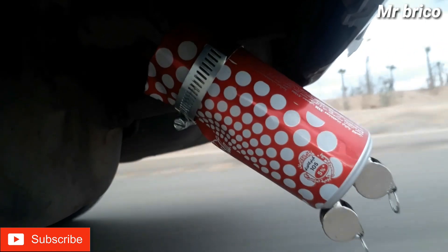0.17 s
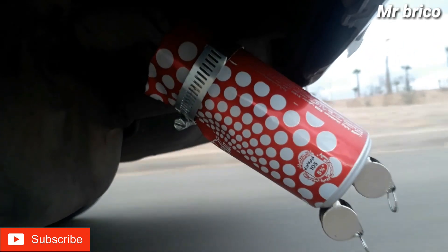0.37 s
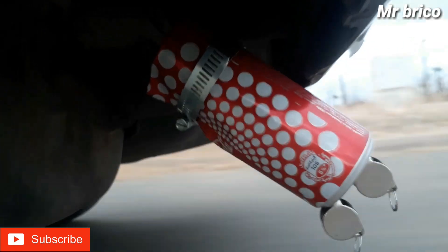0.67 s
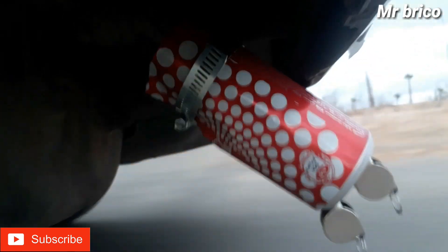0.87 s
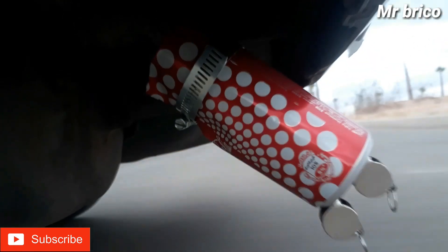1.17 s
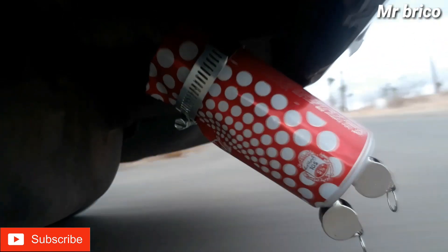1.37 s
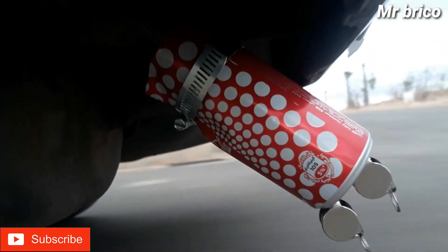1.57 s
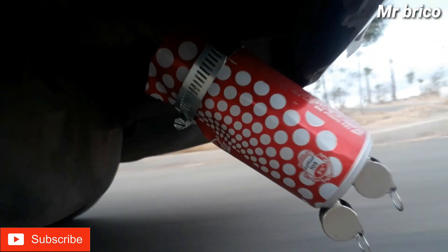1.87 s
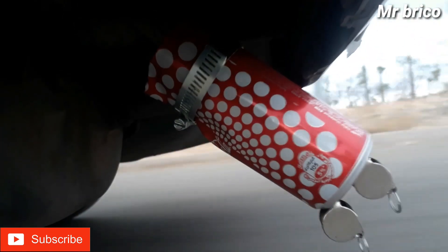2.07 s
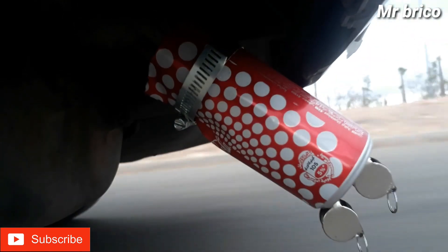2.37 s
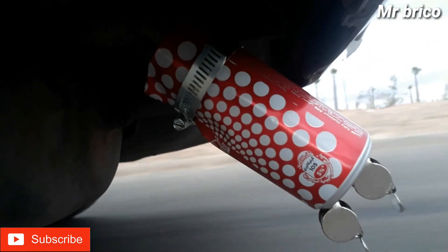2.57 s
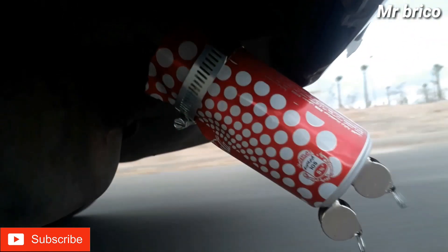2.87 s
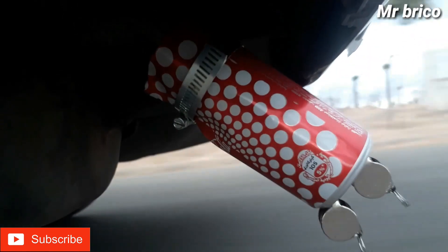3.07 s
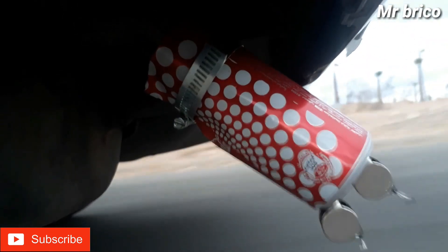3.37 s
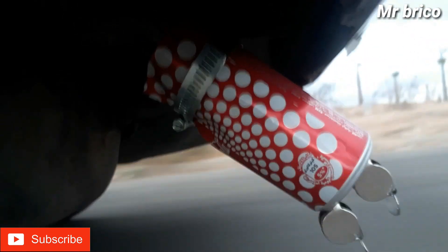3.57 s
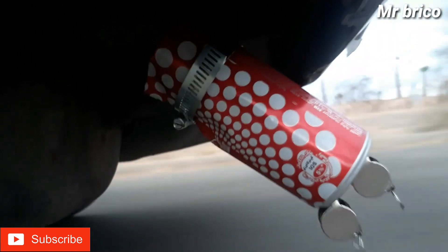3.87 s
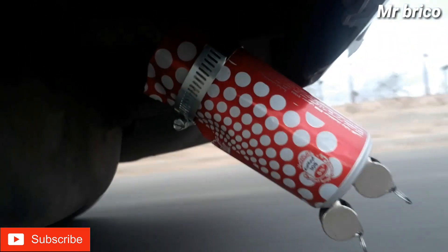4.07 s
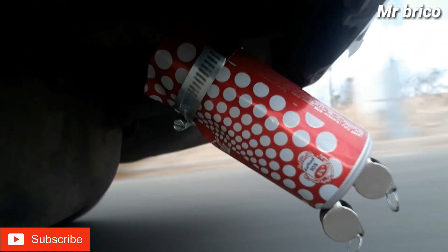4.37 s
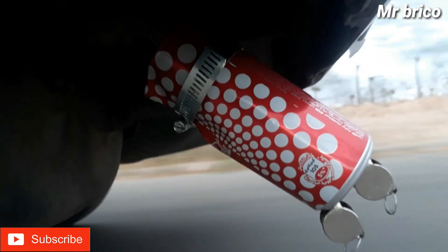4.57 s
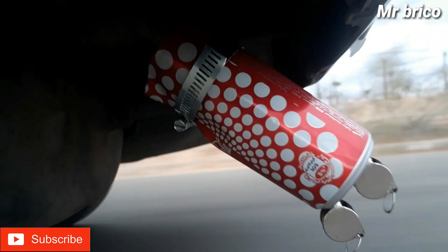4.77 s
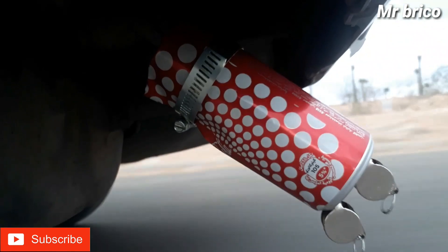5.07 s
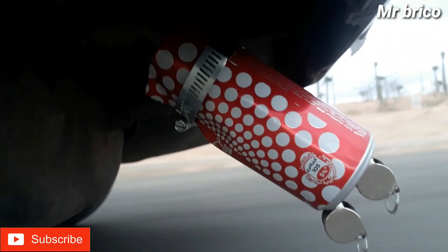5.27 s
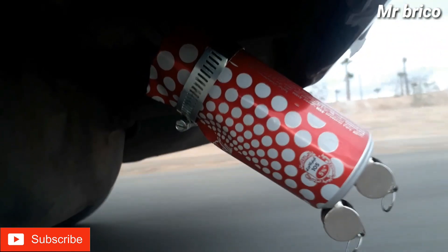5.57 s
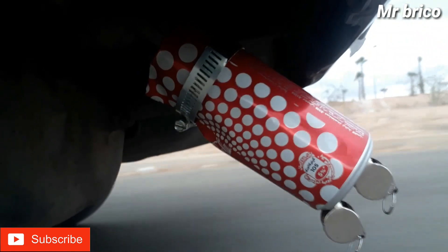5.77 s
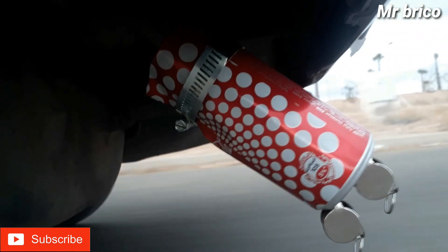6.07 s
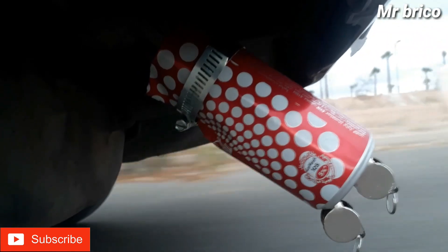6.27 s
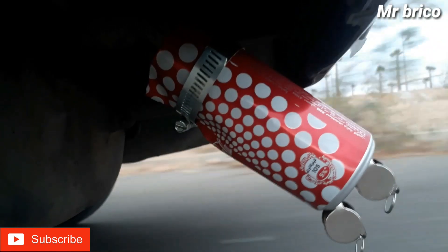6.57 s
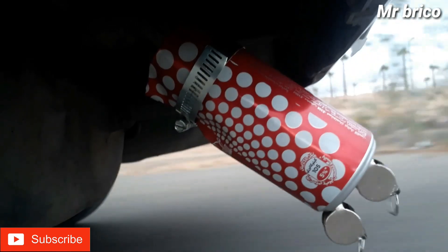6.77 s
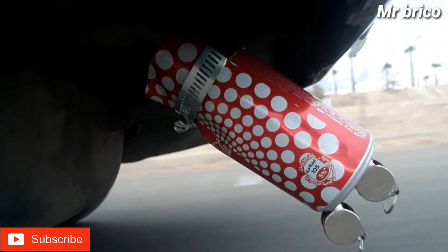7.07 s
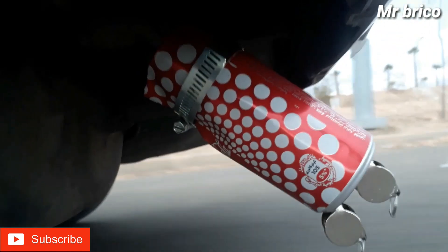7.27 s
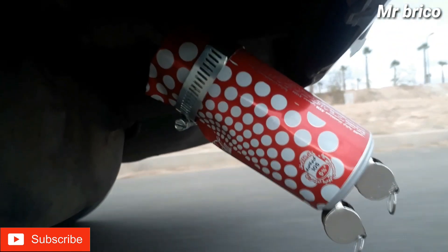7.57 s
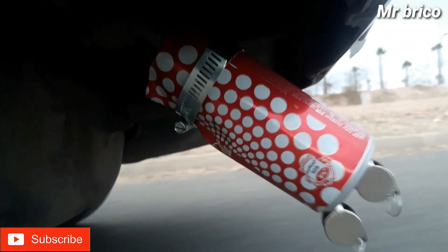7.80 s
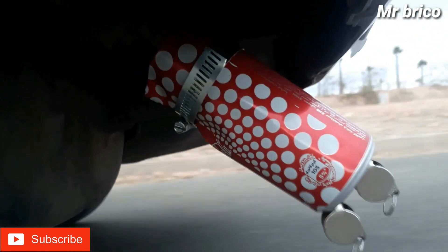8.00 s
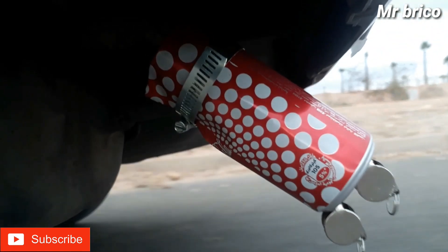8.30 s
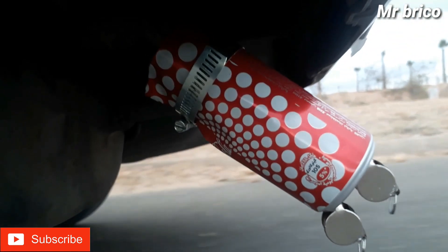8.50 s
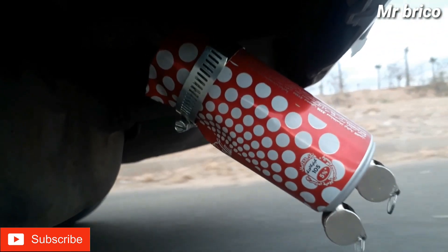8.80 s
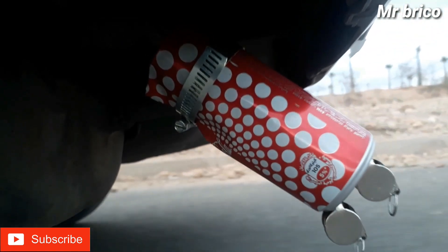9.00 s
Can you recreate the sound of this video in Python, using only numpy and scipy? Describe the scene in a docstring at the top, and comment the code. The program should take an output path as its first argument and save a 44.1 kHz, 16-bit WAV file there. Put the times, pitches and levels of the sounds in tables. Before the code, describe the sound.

Two metal whistles blown by car exhaust warble rapidly, fuse into a piercing rising shriek, then break into slowing chirps over road rumble.

```python
"""Two pea-less whistles in a drink can, clamped over a moving four-cylinder car's tailpipe, are heard from close by.
Exhaust puffs blow them: they warble, merge into a rising shriek as the engine speeds up, then break into idle chirps.
The whistles are swept sine tones with overtones, and filtered noise hisses at their mouths.
Underneath: noise for tyres, air, wind and a rubbing brake, sines for hum, whine and thin squeals,
low thumps from the idling exhaust, and short noise bursts for ticks, knocks and gusts."""
import sys
import numpy as np
from scipy import signal
from scipy.fft import rfft, irfft, next_fast_len
from scipy.io import wavfile

SR = 44100
rng = np.random.default_rng(int(sys.argv[2]) if len(sys.argv) > 2 else 0)


def materialize(psi):
    """Save the field psi as 16-bit PCM at rate SR to the path in sys.argv[1].

    A 1-D psi becomes a single channel; in a 2-D psi each row is a channel.
    """
    bounded = np.clip(np.atleast_2d(psi).T, -1, 1)
    quanta = np.round(bounded * 32767).astype(np.int16)
    wavfile.write(sys.argv[1], SR, quanta)


N = 403062
TIME = np.arange(N) / SR

# Engine speed: time_s, firings_per_s
FIRING = [(0.0, 71.421), (1.762, 78.096), (2.525, 84.857), (3.158, 95.945), (3.981, 105.992),
          (4.523, 79.367), (5.269, 48.342), (5.614, 38.202), (5.803, 31.455), (6.544, 28.406),
          (6.864, 26.452), (7.504, 26.556), (9.14, 26.569)]
# Cylinders in firing order: puff_weakness (scaled by the unevenness), puff_length (ratio)
CYLINDERS = [(.03, 1.05), (.34, 1.02), (.45, .97), (0.0094, .85)]
# Pulsing of the flow: time_s, dip_between_puffs_db (at zero flow), pitch_swing_hz (per unit of flow),
# puff_half_width_firings (before each cylinder's ratio), cylinder_unevenness (factor), cycle_swell (flow)
PULSING = [(0, 38.5, 263, 0.39, 0.71, 0.1), (2.15, 34, 298.5, 0.45, 0.67, 0.14),
           (2.58, 6.5, 164, 0.39, 0.45, 0.056), (3.05, 1.5, 104, 0.48, 0.34, 0.085),
           (4.38, 2, 85, 0.52, 0.34, 0.072), (4.66, 22.5, 380, 0.29, .27, 0.0029),
           (5.86, 51.5, 643.5, 0.2, .13, 0.0098), (5.9, 54, 821.6, .22, 1.45, 0.023),
           (8, 50.5, 620, .195, 1.35, 0.00654), (9.14, 43, 501, 0.19, 0.74, 0.0052)]
# Tyres, air and jets, before each layer's trim: time_s, rumble_db, rush_db, hiss_db
AIR = [(0, -25.5, -29.5, -35.5), (1.5, -24.5, -27.5, -32), (2.4, -30, -36, -40), (3, -27, -32, -37),
       (3.8, -26, -25, -32.5), (4.3, -28.5, -34.5, -36), (5, -31, -31, -40), (5.7, -23, -26.5, -36),
       (6.5, -26, -29, -36.5), (7.3, -35, -36, -39.5), (9.14, -44, -39, -43.5)]
# Wind on the microphone: time_s, level_db
WIND_LEVEL = [(0, -64), (2.1, -50), (2.6, -32), (3.3, -30), (4.3, -35.5), (4.45, -59), (5.25, -45),
              (5.6, -36.5), (9.14, -41.5)]
# Thump of the strong puffs at idle, before puff strength: time_s, level_db
THUMP = [(5.25, -55), (5.55, -18), (5.8, -14), (6.9, -15), (7.7, -25), (9.14, -32.5)]
# Exhaust hum, before the pipe colours it: time_s, level_db
HUM = [(0, -36), (3, -36.5), (3.9, -47), (4.5, -37), (5.5, -38), (6.2, -48), (9.14, -56)]
# The pipe's response to the hum: frequency_hz, gain_db
PIPE = [(25, -31), (45, -1), (88, -2), (115, -4), (150, -1.5), (180, -0.5), (225, 1), (245, -16),
        (320, -22)]
# Drivetrain whine, sinking as the engine slows: time_s, pitch_hz, level_db
WHINE = [(0, 1100, -80), (4.9, 1100, -60), (5.2, 1000, -44), (5.45, 880, -41), (5.7, 780, -38),
         (5.9, 740, -55), (9.14, 740, -80)]
# Rubbing brake: time_s, level_db
RUB = [(0, -75), (4.8, -60), (5.25, -45), (7, -42), (8, -42), (9.14, -44)]
# Brake disc resonances: centre_hz, width_hz, relative_level_db
DISC = [(6580, 130, -1), (8580, 75, -7), (10300, 80, 0), (11300, 50, -9), (12400, 90, -6), (13060, 100, -5)]
# Brake squeals: peak_s, level_db, swell_s, fade_s
SQUEALS = [(4.5, -25.5, 0.025, 0.03), (6.76, -21.5, 0.018, .17), (7.151, -26, 0.021, 0.061),
           (7.58, -26.5, .2, 0.093), (8.02, -38.5, 0.051, 0.059), (8.2, -37.5, 0.021, 0.13),
           (8.62, -28.5, 0.076, 0.032), (9.01, -29.5, 0.017, .12)]
# Ticks on metal, from grit and the whistles' rings: start_s, level_db
TICKS = [(.28, -23), (5.49, -16), (6.465, -30), (6.808, -15.5), (6.927, -9)]
# Dull knocks under the car: start_s, level_db
KNOCKS = [(.37, -20), (.626, -15), (.68, -14)]
# Rough gusts at full speed: start_s, level_db
GUSTS = [(3.112, -21), (3.202, -18), (3.246, -19.5), (3.295, -19), (3.452, -20), (3.768, -20), (3.868, -21),
         (3.935, -23.5)]

# Noise colours, scaled to unit power in use: frequency_hz, relative_density_db
RUMBLE = [(25, -34), (55, -28), (100, -4.5), (150, -0.5), (250, 1.5), (330, 0.5), (420, -3), (530, -5),
          (585, -0.5), (640, -13.5), (1000, -12.5), (2000, -42)]  # tyre rumble
RUSH = [(300, -35), (650, 3), (800, 4.5), (1020, 4.5), (1300, 1.5), (1700, -1.5), (2600, 0.5),
        (5000, -16.5)]  # tyre and air rush, also the gusts
HISS = [(800, -3.5), (1800, 4.5), (3500, 16), (5000, 10), (6700, 10), (7600, 10.5), (10500, 10), (11600, 8),
        (12300, 13.5), (13200, 9), (16000, 2.5)]  # whistle jets
WIND = [(20, -32), (40, -12), (65, 9), (110, 9.5), (180, 5), (400, -53)]  # wind on the microphone
TICK_COLOUR = [(2000, 0), (5000, -8), (8500, 1), (12000, -3), (16000, -9)]  # metal ticks
KNOCK_COLOUR = [(400, -10), (850, -10), (1050, -2), (1300, -10), (1700, -15), (2500, -28)]  # underbody knocks

# Main whistle's blowing: time_s, mean_pitch_hz, level_db, overtone_db (from the fundamental, before a trim)
WHISTLE = [(0, 2360, -16, -8), (0.8, 2395, -13, -7.5), (1.7, 2479, -12.5, -10.5), (2.3, 2668, -8, -15.5),
           (2.8, 2777, -4.5, -9.5), (3.66, 3075, -11, 0), (3.87, 3052, -10, -2), (4, 2930, -6.5, -4.5),
           (4.36, 2683, -8.5, -10.5), (4.52, 2610, -13.5, -9.5), (4.93, 2323, -25.5, -1.5),
           (5.27, 2079, -28, -2), (5.52, 2100, -19.5, -1.5), (5.73, 2400, -13.5, -6.5),
           (5.9, 2330, -18.5, -2.5), (6.63, 2307, -19.5, -4), (6.88, 2081, -24.5, -0.5),
           (7.5, 2112, -26.5, -1.5), (7.74, 1935, -28.5, 0.5), (9.14, 1885, -34, 3)]
# Whistle overtones: pitch_multiple, level_db (against the overtone level)
OVERTONES = [(2, 0), (3, -3.5), (4, -7), (5, -11)]
# Spells when the whistle may choke: start_s, end_s, chance_per_weak_puff, depth_db (before cycle levelling)
CHOKING = [(2.5, 3.1, .3, 10.5), (3.6, 3.7, .25, 49), (4.07, 4.42, .35, 19.5)]
# Second whistle, speaking on the gentle flanks of the puffs: time_s, level_db
FLANKS = [(0, -70), (4.78, -42), (4.98, -27.5), (5.4, -31), (7, -28), (9.14, -28.5)]
# Chirps of the two weak cylinders: crest_firings (after cycle start), relative_level_db, lead_in_s, run_out_s
CHIRPING = [(1.249, -1.5, 0.013, 0.005), (2.111, 0.5, 0.0074, 0.0039)]
# Chirp level, before a trim and each chirp's own offset: time_s, level_db
CHIRP_LEVEL = [(4.8, -48), (5.05, -14), (5.35, -45), (5.85, -43), (5.92, -8), (6.2, -7), (6.7, -2.5),
               (7.5, -3.5), (8.45, -10.5), (9.14, -21)]

ARCH_HZ_PER_SWELL = 400  # the pitch also arches with each engine cycle's swell
UNDERBODY_DB, UNDERBODY_DELAY_S, UNDERBODY_DECAY_S = -16.5, 0.0017, 0.0043
CUTOFF_HZ = 15800


def from_db(db):
    """Decibels to gain."""
    return 10 ** (np.asarray(db) / 20)


def rms_one(x):
    """Scale to unit power."""
    return x / np.sqrt(np.mean(np.abs(x) ** 2) + 1e-20)


def in_time(rows):
    """Draw one automation curve per column, at every sample."""
    times, *columns = np.transpose(rows)
    return [np.interp(TIME, times, column) for column in columns]


def shaped(gain_at):
    """Unit noise whose amplitude spectrum is a function of frequency."""
    size = next_fast_len(N)
    hz = np.maximum(np.fft.rfftfreq(size, 1 / SR), 1)
    spectrum = rfft(rng.standard_normal(size)) * gain_at(hz)
    return rms_one(irfft(spectrum, size)[:N])


def noise(colour):
    """Unit noise coloured by points on a log frequency axis."""
    points_hz, db = np.transpose(colour)
    return shaped(lambda hz: from_db(np.interp(np.log(hz), np.log(points_hz), db, left=-80, right=-80)))


def drift(rate_hz):
    """Random wander of spread 1, up to about this rate."""
    return shaped(lambda hz: 1 / (1 + (hz / rate_hz) ** 2))


def resonance(centre_hz, width_hz):
    """Unit noise ringing in one narrow resonance."""
    return shaped(lambda hz: 1 / (1 + ((hz - centre_hz) / width_hz) ** 2))


def angle(hz):
    """Running phase of a pitch curve."""
    return 2 * np.pi * np.cumsum(hz) / SR


def lagging(x, lag_s):
    """Follow a control with a short smoothing lag."""
    keep = np.exp(-1 / (lag_s * SR))
    return signal.lfilter([1 - keep], [1, -keep], x)


def cycle_mean(x, firings):
    """Mean of x over the four firings around each moment."""
    total = np.cumsum(x)
    first, last = (np.clip(np.searchsorted(firings, firings + k), 0, N - 1) for k in (-2, 2))
    return (total[last] - total[first]) / (last - first)


def throb(gain, firings):
    """Keep the pulsing of a gain but level each engine cycle to unit power."""
    return gain / np.sqrt(cycle_mean(gain ** 2, firings) + 1e-12)


def cycle_times(firings, place):
    """The moments when each engine cycle reaches a place, counted in firings."""
    return np.interp(np.arange(place, firings[-1], len(CYLINDERS)), firings, TIME)


def road(rumble_gain_db=-2.5, rush_gain_db=-3.0, gust_db=2.0):
    """Tyres on asphalt and air under the car: two wavering bands of noise."""
    rumble_db, rush_db, _ = in_time(AIR)
    rumble = from_db(rumble_db + rumble_gain_db + gust_db * drift(58)) * noise(RUMBLE)
    rush = from_db(rush_db + rush_gain_db + gust_db * drift(49)) * noise(RUSH)
    return rumble + rush


def buffeting(firings, rate, strength, delay_s=0.01143, thump_hz=88, length_s=0.0077):
    """Wind on the microphone; each strong slow puff reaches it a moment later as a low thump."""
    (wind_db,), (thump_db,) = in_time(WIND_LEVEL), in_time(THUMP)
    wind = from_db(wind_db + 1.06 * drift(36)) * noise(WIND)
    t = firings % 1 / rate - delay_s
    body = np.cos(2 * np.pi * thump_hz * t) + 0.44 * drift(260)
    thump = np.exp(-(t / length_s) ** 2) * body
    return wind + from_db(thump_db) * strength ** 2 * thump


def hits(rows, colour, decay_s):
    """Short bursts of coloured noise with an instant attack and a fast exponential decay."""
    blows = np.zeros(N)
    for start_s, level_db in rows:
        blows[int(start_s * SR)] = from_db(level_db)
    envelope = signal.lfilter([1], [1, -np.exp(-1 / (decay_s * SR))], blows + 1e-18)
    return envelope * noise(colour)


def brake(squeal_hz=9000, waver_hz=38):
    """The pad rubs the disc's modes as noise; a separate locked tone swells and fades as squeals."""
    rub_db, = in_time(RUB)
    rub = rms_one(sum(from_db(db + 2.5 * drift(8)) * resonance(hz, width) for hz, width, db in DISC))
    locked = np.zeros(N)
    for peak_s, level_db, swell_s, fade_s in SQUEALS:
        distance = np.maximum((peak_s - TIME) / swell_s, (TIME - peak_s) / fade_s)
        locked += from_db(level_db) * np.exp(-np.minimum(distance, 20))
    tone = np.sin(angle(squeal_hz + waver_hz * drift(79.0)))
    squeal = locked * from_db(2 * drift(68)) * tone
    return from_db(rub_db) * rub + np.sqrt(2) * squeal


def whine(waver_hz=22):
    """An unsteady sine from the drivetrain."""
    hz, db = in_time(WHINE)
    level = np.sqrt(2) * from_db(db + 4.9 * drift(27.4))
    return level * np.sin(angle(hz + waver_hz * drift(53)))


def exhaust_hum(firings, rate, waver_db=1.5):
    """The three lowest multiples of the firing rate, coloured by the pipe."""
    hum_db, = in_time(HUM)
    pipe_hz, pipe_db = np.transpose(PIPE)
    hum = np.zeros(N)
    for k in (1, 2, 3):
        response_db = np.interp(np.log(k * rate), np.log(pipe_hz), pipe_db)
        level = from_db(hum_db + response_db + waver_db * drift(25))
        hum += level * np.sin(2 * np.pi * k * firings)
    return np.sqrt(2) * hum


def exhaust_flow(firings, width, uneven, swell, scatter=0.0299, front=3.9, tail=1.0):
    """Overlapping puffs, one per firing; returns the flow and the strength of the latest puff."""
    weakness, length = np.transpose(CYLINDERS)
    latest = np.floor(firings).astype(int)
    chance = rng.standard_normal(latest[-1] + 2)

    def strength(k):
        """Peak flow of puff k, with its cylinder's weakness and a little chance."""
        return 1 - uneven * weakness[k % len(CYLINDERS)] + scatter * chance[k]

    def span(k):
        """Half-width of puff k in firings."""
        return width * length[k % len(CYLINDERS)]

    dying = strength(latest) * np.exp(-((firings - latest) / (tail * span(latest))) ** 2)
    # a puff has a steep front
    coming = strength(latest + 1) * np.exp(-((latest + 1 - firings) / span(latest + 1)) ** front)
    cycle_swell = swell * np.cos(2 * np.pi * (firings - .15) / len(CYLINDERS))
    return dying + coming + cycle_swell, strength(latest)


def jet_hiss(flow, firings, dip_db, spit_db=2.5, gain_db=6.0):
    """Turbulence at the whistle mouths: noise in spurts that follow the flow."""
    hiss_db = in_time(AIR)[2]
    depth_db = 5 + dip_db * np.interp(TIME, [4, 5.5], [.07, .42])
    # slow puffs leave quiet gaps, fast ones run together
    spurts = from_db(depth_db * np.sqrt(np.clip(flow, 0, 1)) + spit_db * drift(210))
    return from_db(hiss_db + gain_db) * throb(spurts, firings) * noise(HISS)


def saturate(height):
    """A whistle's oscillation cannot grow beyond a ceiling."""
    return height / (1 + (height / .8) ** 6) ** (1 / 6)


def second_whistle(flow, firings, best_flow=0.43, reach=0.12, overblown=0.38,
                   rest_hz=2680, rise_hz=650, jitter_hz=110, fitful_db=3.5):
    """It speaks fitfully in a gentle flow and is mostly choked at the crest of a puff."""
    level_db, = in_time(FLANKS)
    gentle = np.exp(-((flow - best_flow) / reach) ** 2) * np.tanh(flow / .1)
    speaks = gentle + overblown * np.maximum(flow, 0) ** 2
    gain = throb(speaks * from_db(fitful_db * drift(40.9) + 2 * drift(185)), firings)
    hz = rest_hz + rise_hz * flow + jitter_hz * (0.43 + flow) * drift(613)
    return np.sqrt(2) * from_db(level_db) * gain * np.sin(angle(hz))


def chirp_events(firings, scatter_db=1.95, scatter_s=.0007, lead_spread=0.071):
    """One chirp per weak puff, each a little different: crest_s, level_db, lead_in_s, run_out_s."""
    rows = []
    for place, offset_db, lead_s, run_out_s in CHIRPING:
        times = cycle_times(firings, place)
        times = times[times > CHIRP_LEVEL[0][0]]
        for s, (late, loud, long) in zip(times, rng.standard_normal((len(times), 3))):
            level_db = np.interp(s, *np.transpose(CHIRP_LEVEL)) + offset_db + scatter_db * loud
            rows.append((s + scatter_s * late, level_db, lead_s * np.exp(lead_spread * long), run_out_s))
    return rows


def chirps(firings, top_hz=3080, fall_hz=340, lead_share=0.24, edge_s=0.00033,
           ring_share=0.031, ring_s=0.0081, gain_db=0.5):
    """A weak puff lets the second whistle sound fully; its pitch sags as the puff dies."""
    out, wobble_hz, flutter = np.zeros(N), 45 * drift(250), from_db(1.5 * drift(200))
    for crest_s, level_db, lead_s, run_out_s in chirp_events(firings):
        near = slice(int((crest_s - .03) * SR), int((crest_s + .05) * SR))
        t = TIME[near] - crest_s
        opens = (1 + np.tanh((t + lead_s) / edge_s)) / 2
        closes = (1 + np.tanh((run_out_s - t) / edge_s)) / 2
        crest = np.exp(-(t / (.7 * run_out_s)) ** 2)
        blown = closes * (lead_share + (1 - lead_share) * crest)
        ring = (1 - closes) * ring_share * np.exp(-np.abs(t - run_out_s) / ring_s)
        sag_hz = fall_hz * np.exp(-((t - run_out_s) / 0.0049) ** 2) + 150 * (1 - closes)
        height = from_db(level_db + gain_db) * opens * (blown + ring) * flutter[near]
        out[near] += saturate(height) * np.sin(angle(top_hz - sag_hz + wobble_hz[near]))
    return out


def chokes(firings, length_s=.004):
    """Level lost, in dB, when the whistle stalls at random around the two weak puffs."""
    times = np.concatenate([cycle_times(firings, place) for place in (1.3, 2.3)])
    luck, lost_db = rng.random(len(times)), np.zeros(N)
    for start_s, end_s, chance, depth_db in CHOKING:
        for s in times[(times > start_s) & (times < end_s) & (luck < chance)]:
            lost_db += depth_db * np.exp(-np.minimum(((TIME - s) / length_s) ** 2, 20))
    return lost_db


def main_whistle(flow, firings, dip_db, swing_hz, swell, slope_db=7.0, soft_db=9.0, rough=0.35):
    """Pitch and level follow the flow; turbulence shakes both, with more pitch jitter when blown softly."""
    mean_hz, level_db, overtone_db = in_time(WHISTLE)
    soft = np.clip((3000 - mean_hz) / 1000, 0, 1)

    speaks_db = slope_db * flow - dip_db * np.maximum(1 - flow, 0) ** 2.2
    flutter_db = (.9 + .9 * soft) * drift(130) + 1.5 * (1 - soft) * drift(30)
    gain = throb(from_db(speaks_db - chokes(firings) + flutter_db), firings)

    push = lagging(flow, lag_s=.0011)  # the pitch trails the puff, so each note sweeps upward
    bend = push - cycle_mean(push * gain ** 2, firings)
    cycle_wave = np.cos(2 * np.pi * (firings - .3) / len(CYLINDERS))
    arch_hz = ARCH_HZ_PER_SWELL * swell * (cycle_wave + .5 * drift(25))
    arch_hz = arch_hz - cycle_mean(arch_hz * gain ** 2, firings)
    jitter_hz = (21 + 26 * soft) * drift(170)
    phase = angle(mean_hz + swing_hz * bend + arch_hz + jitter_hz)

    overtones = np.zeros(N)
    for k, db in OVERTONES:
        # soft blowing thins the upper overtones and roughens them all
        level = from_db(db - soft_db * soft * (k - 2.5) + 2.73 * drift(114))
        overtones += level * np.sin(round(k) * phase + rough * (1 / 2 + soft) * drift(180))
    edge = throb(gain ** (3 / 4), firings)  # the overtones outlast the fundamental on a puff's flanks
    height = np.sqrt(2) * from_db(level_db)
    fundamental = saturate(height * gain) * np.sin(phase)
    return fundamental + height * edge * from_db(overtone_db - 10.5) * overtones


def underbody(x):
    """A short tail of dense reflections between the road and the underbody."""
    t = TIME[:SR // 20]
    tail = rng.standard_normal(len(t)) * np.exp(-t / UNDERBODY_DECAY_S) * (t > UNDERBODY_DELAY_S)
    tail = rms_one(tail) / np.sqrt(len(t))
    return from_db(UNDERBODY_DB) * signal.fftconvolve(x, tail)[:N]


def scene():
    """One engine drives the whistles, hiss, hum and thumps; the mono mix fills both channels."""
    rate, = in_time(FIRING)
    firings = .3 + np.cumsum(rate) / SR
    dip_db, swing_hz, width, uneven, swell = in_time(PULSING)
    flow, strength = exhaust_flow(firings, width, uneven, swell)

    car = road() + buffeting(firings, rate, strength) + brake() + whine() + exhaust_hum(firings, rate)
    rattles = hits(TICKS, TICK_COLOUR, decay_s=0.0048) + hits(KNOCKS, KNOCK_COLOUR, decay_s=0.0099)
    gusts = hits(GUSTS, RUSH, decay_s=0.007)
    can = jet_hiss(flow, firings, dip_db) + second_whistle(flow, firings) + chirps(firings)
    can = can + main_whistle(flow, firings, dip_db, swing_hz, swell)
    return np.tile(can + underbody(can) + car + rattles + gusts, (2, 1))


def record(dry):
    """The highest peaks are rounded off and the top is cut."""
    rounded = dry / (1 + dry ** 12) ** (1 / 12)
    low_pass = signal.ellip(12, .1, 80, CUTOFF_HZ, fs=SR, output="sos")
    return signal.sosfilt(low_pass, rounded)


dry = scene()
out = record(dry)
materialize(out)
```